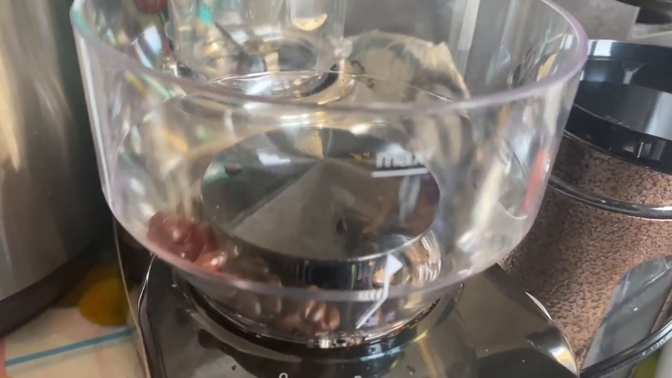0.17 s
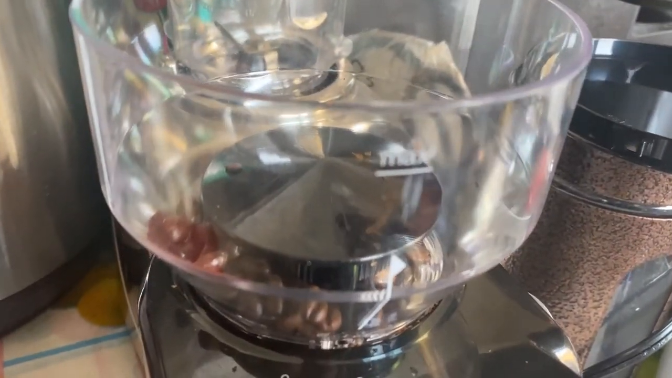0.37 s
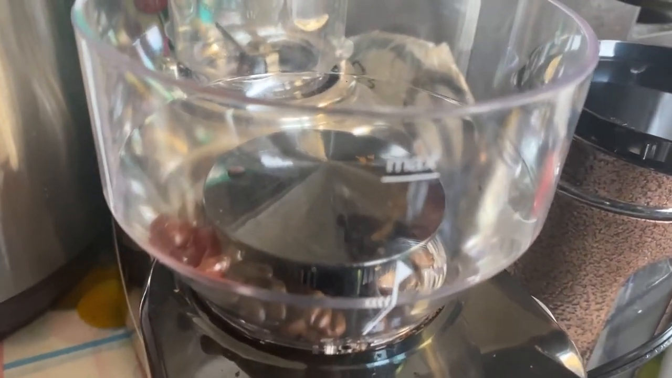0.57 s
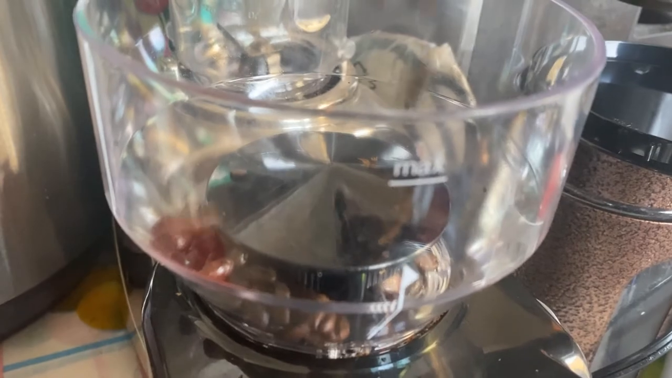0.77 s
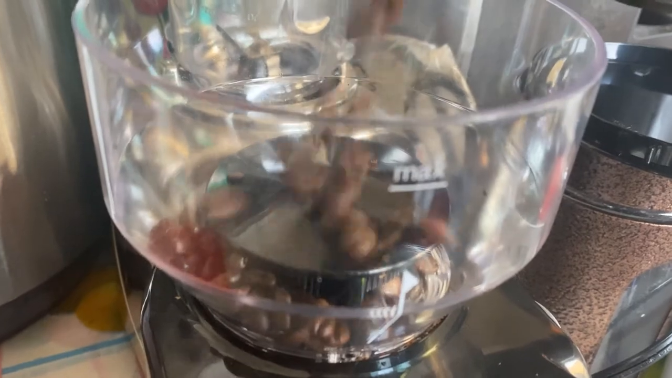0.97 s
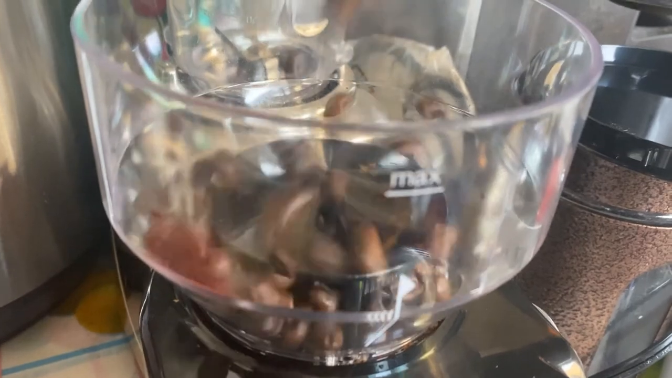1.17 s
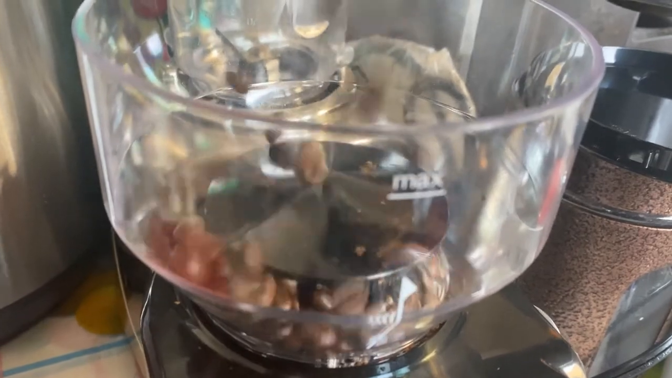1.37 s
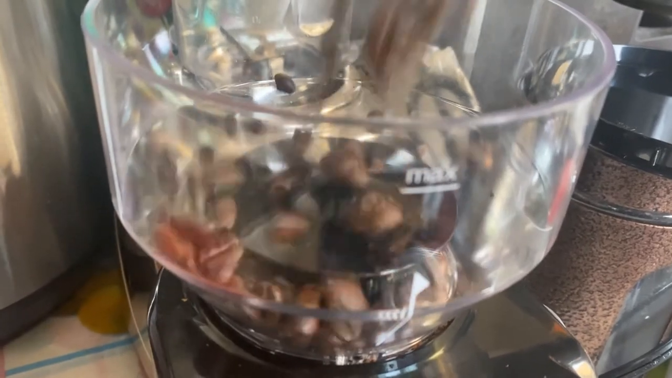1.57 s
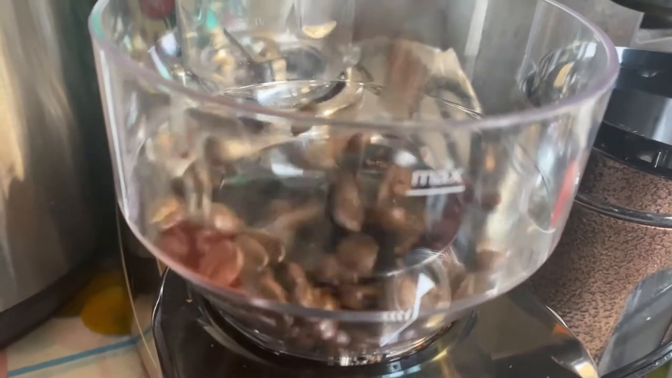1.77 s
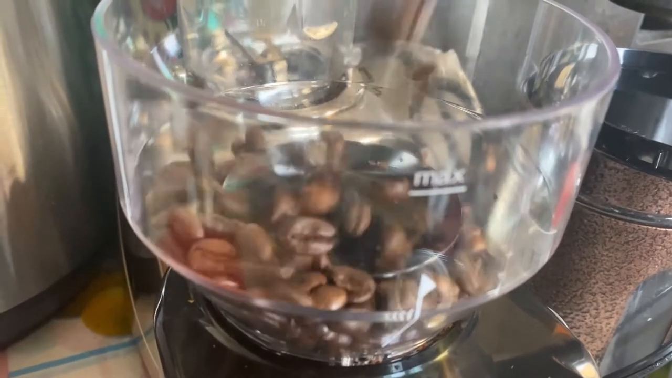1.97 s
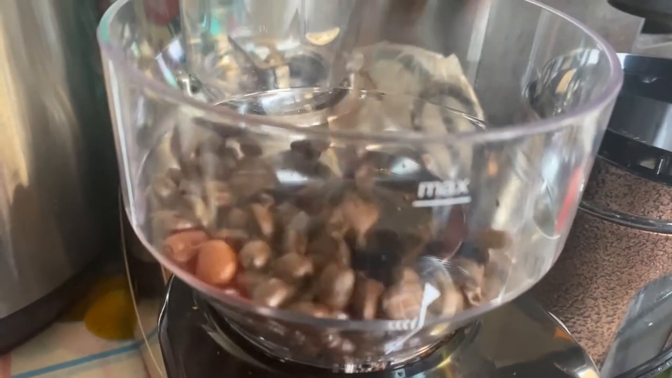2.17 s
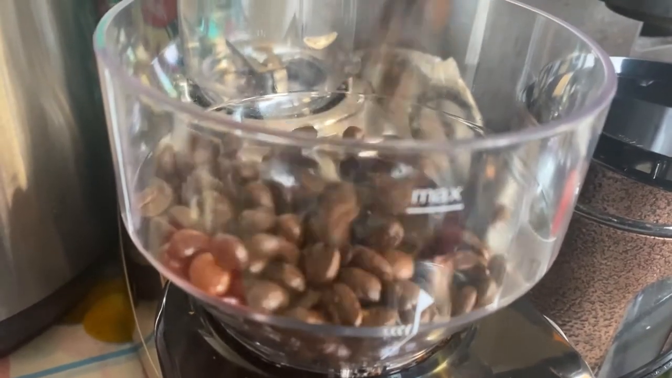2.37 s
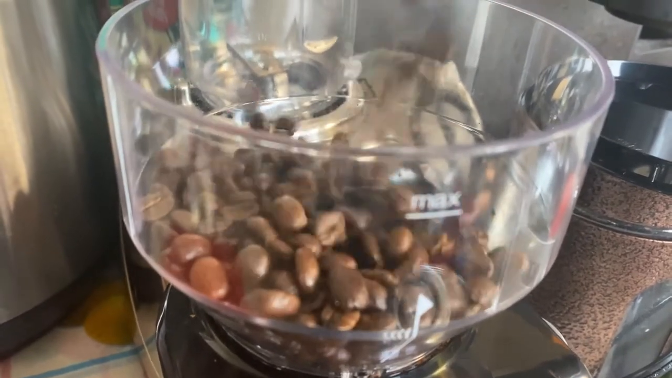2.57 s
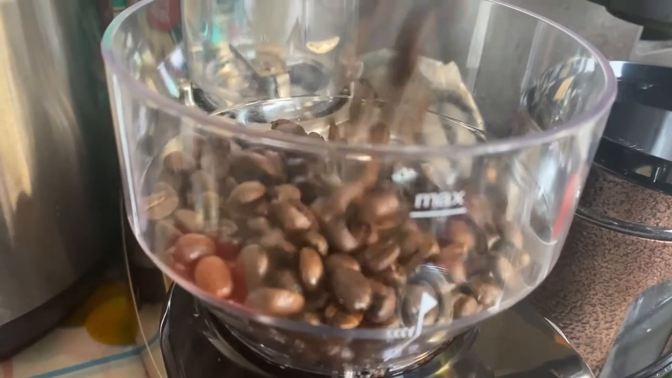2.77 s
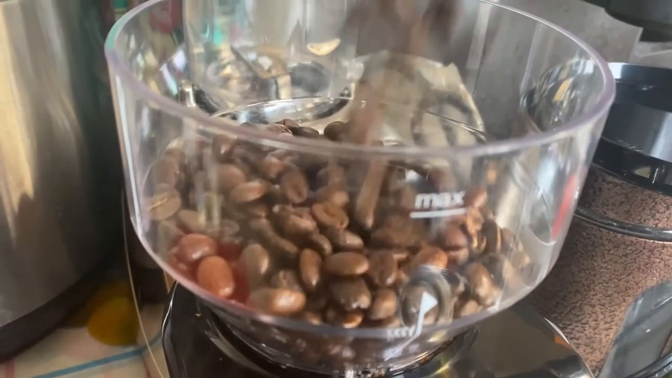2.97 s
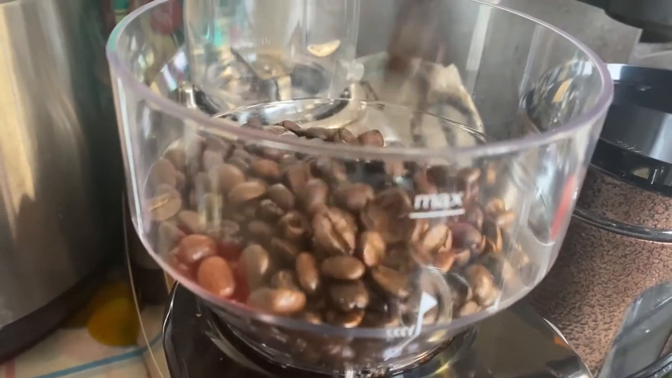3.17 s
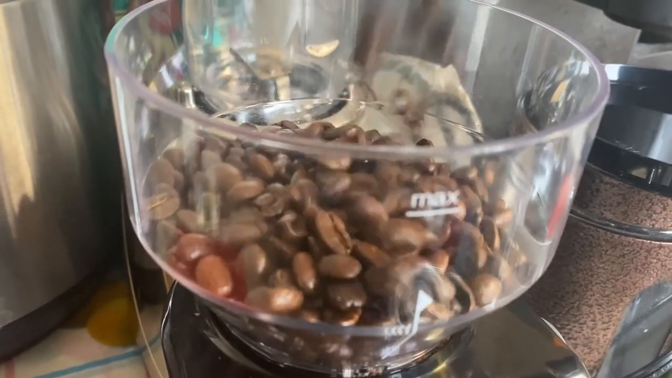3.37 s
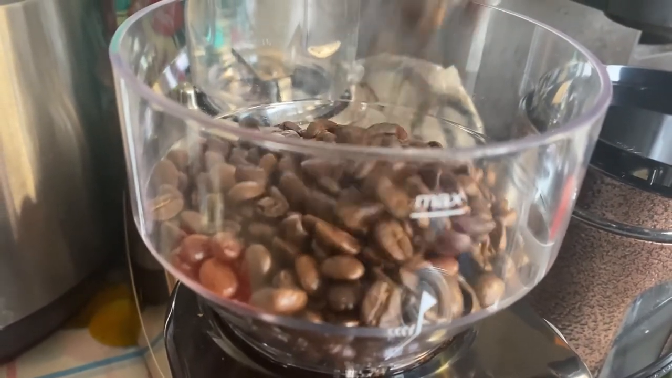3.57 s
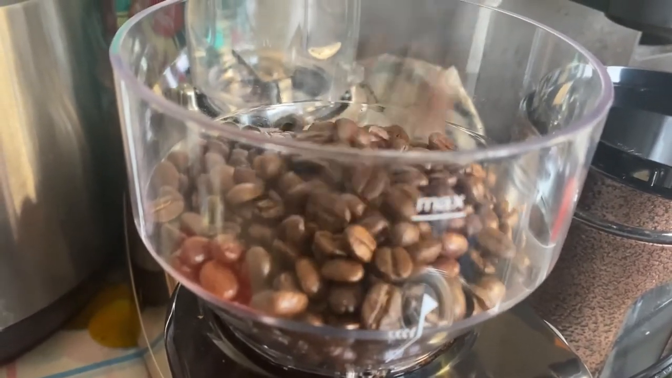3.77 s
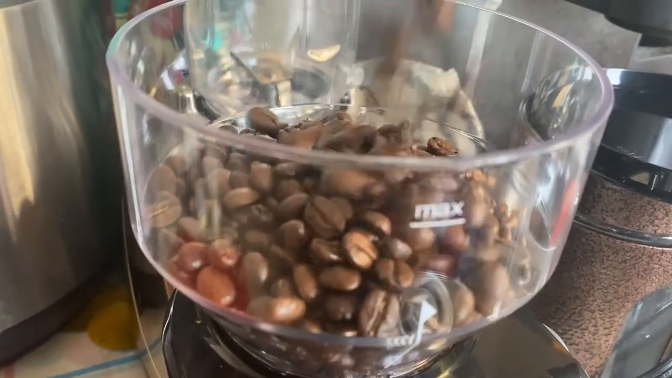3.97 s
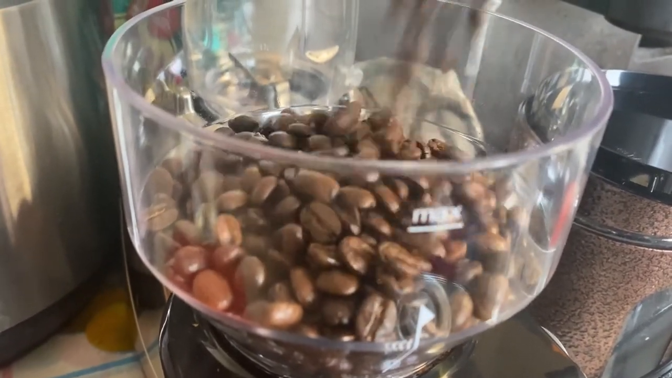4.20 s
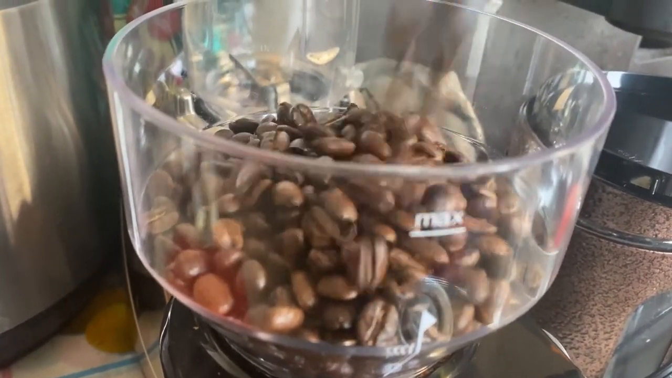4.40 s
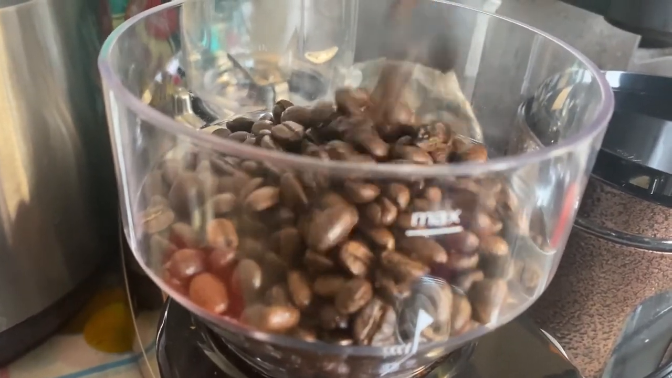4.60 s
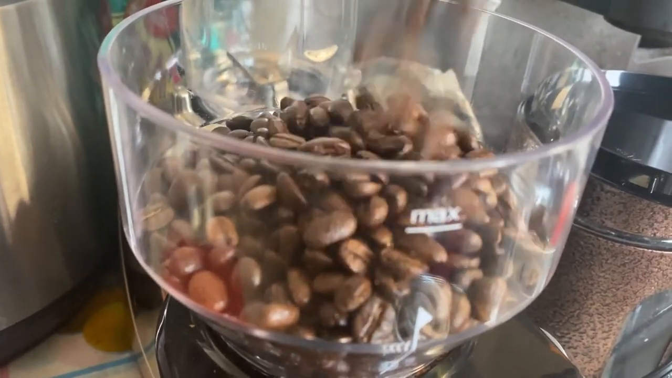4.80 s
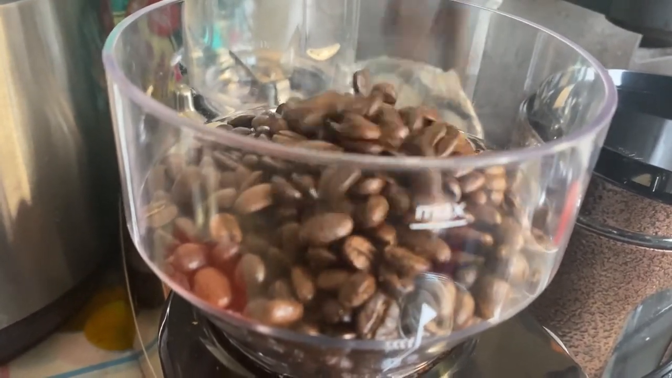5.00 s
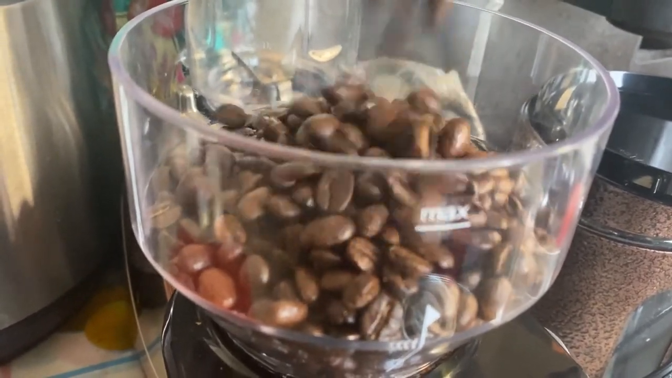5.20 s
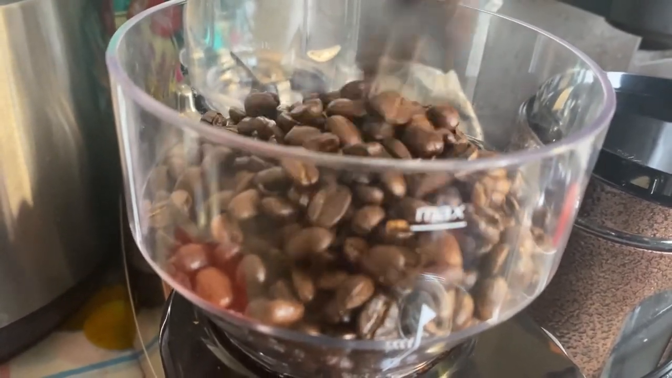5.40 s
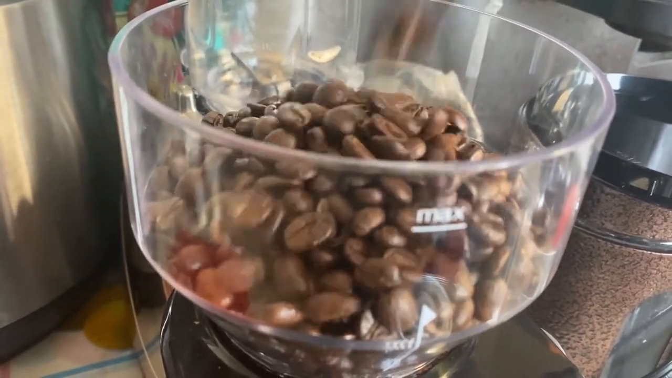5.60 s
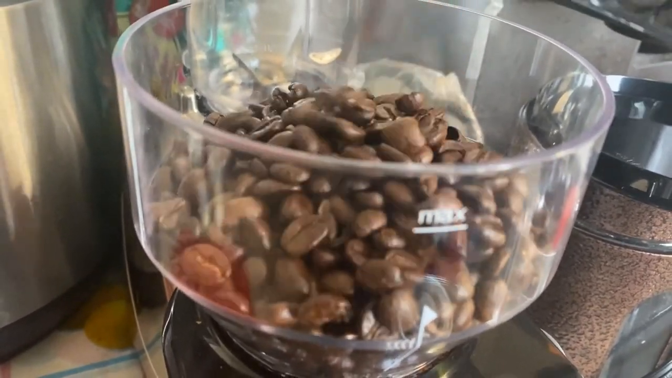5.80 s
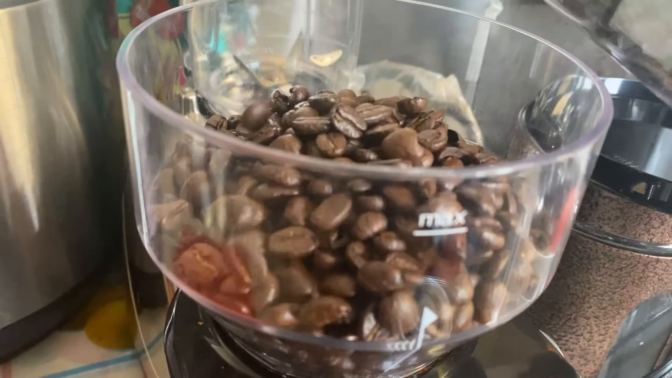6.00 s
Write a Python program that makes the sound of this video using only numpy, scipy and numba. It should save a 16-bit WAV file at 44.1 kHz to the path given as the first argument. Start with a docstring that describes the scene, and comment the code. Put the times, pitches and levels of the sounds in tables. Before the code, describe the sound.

In a home kitchen with a low throbbing hum, a few coffee beans tick and knock in a tipped container. Suddenly they pour into a grinder's empty plastic hopper, cracking sharply on the bare cover and ringing walls. The dense rattle surges, then grows softer and quieter as beans land on beans, ending in sparse ticks. Close stereo microphone, short room reflections.

```python
"""A low hum throbs in a home kitchen while a few coffee beans tick and slide in a container being tipped.
Then they pour into a grinder's clear plastic hopper, striking the bare burr cover and the wall, which ring.
Later they land on the growing heap, which damps the hopper and leaves a soft, dense ticking.
Clicks set off noise bursts, pings and ringing modes; the room is filtered noise, the echo a short noise tail."""
import sys
import numpy as np
from scipy import signal
from scipy.fft import rfft, irfft, next_fast_len
from scipy.io import wavfile
from scipy.ndimage import uniform_filter1d
from numba import njit

SR = 44100
rng = np.random.default_rng(int(sys.argv[2]) if len(sys.argv) > 2 else 0)


def wav_record(signal):
    """Record a signal, one row per channel, as 16-bit PCM in the file named by sys.argv[1]."""
    frames = np.transpose(np.atleast_2d(signal))
    bounded = np.clip(frames, -1, 1)
    # unit amplitude maps onto the largest positive 16-bit level
    quanta = np.round(bounded * 32767).astype(np.int16)
    wavfile.write(sys.argv[1], SR, quanta)


N = 266760
TIME = np.arange(N) / SR
PADDED = next_fast_len(N + SR // 2)   # spare room so that filter tails do not wrap around
FREQS = np.maximum(np.fft.rfftfreq(PADDED, 1 / SR), 1)
CUTOFF_HZ = 15850   # top of the sound
CRACK_S, RING_S = .005, .009   # lengths over which the levels of cracks and of thuds are meant


def from_db(db):
    """Decibels to gain."""
    return 10 ** (np.asarray(db) / 20)


def in_time(rows):
    """Each column of a curve at every sample."""
    s, *columns = np.transpose(rows)
    return [np.interp(TIME, s, column) for column in columns]


def at_hz(points):
    """A spectrum table at every frequency."""
    hz, value = np.transpose(points)
    return np.interp(np.log(FREQS), np.log(hz), value)


def filtered(x, response):
    """Apply a frequency response."""
    return irfft(rfft(x, PADDED) * response, PADDED)[..., :N]


def high_passed(x, edge_hz):
    """Small bodies radiate little below their lowest mode."""
    return signal.sosfilt(signal.butter(4, edge_hz, "high", fs=SR, output="sos"), x)


def coloured(x, spectrum):
    """Filter to a colour without smearing clicks backwards (minimum phase), at unit power gain."""
    gain = from_db(at_hz(spectrum))
    gain = gain / np.sqrt(np.mean(gain[FREQS < CUTOFF_HZ] ** 2))
    cepstrum = irfft(np.log(gain), PADDED)
    # folding the second half onto the first makes the filter minimum-phase
    cepstrum[1:PADDED // 2] *= 2
    cepstrum[PADDED // 2 + 1:] = 0
    return filtered(x, np.exp(rfft(cepstrum)))


def panned(left_db):
    """Left and right gains that keep the power."""
    gains = from_db(np.array([[.5], [-.5]]) * left_db)
    return gains / np.sqrt(np.mean(gains ** 2, axis=0))


def wander(length):
    """Smooth random curve of spread 1 that changes over the given seconds."""
    size = max(int(length * SR), 1)
    return uniform_filter1d(rng.standard_normal(N), size) * np.sqrt(size)


# Colour of the room's noise. Each row: frequency in Hz, relative level in dB.
ROOM_COLOUR = [(20, -13), (40, -8), (62, 3.5), (100, -10), (150, -10), (250, -17), (450, -22), (750, -37),
               (1500, -41.5), (6000, -46), (9000, -55), (16000, -75)]
# Loudness of the room, hum included. Each row: time in seconds, level in dB.
ROOM_LEVEL_CURVE = [(0, -53), (0.92, -54), (1.05, -64), (2.4, -65.5), (5.0, -61), (6.05, -58.5)]
HUM_HZ, HUM_WIDTH_HZ = 60.7, 7.5
HUM_DB = -17.5   # against the room's noise


def background():
    """Room rumble and hiss, with a hum made of a narrow band of noise, which therefore throbs."""
    level_db, = in_time(ROOM_LEVEL_CURVE)
    shared = rng.standard_normal(N)
    separate = 0.37 * rng.standard_normal((2, N))   # different at each side
    air = coloured(shared + separate, ROOM_COLOUR)
    hum_band = 1 / (1 + (2 * (FREQS - HUM_HZ) / HUM_WIDTH_HZ) ** 2)
    hum = filtered(rng.standard_normal(N), hum_band)
    return from_db(level_db) * (air + from_db(HUM_DB) * hum / np.std(hum))


def clicks_at(times, levels_db, length):
    """One click per event, holding the energy of that level kept up for the given seconds."""
    out = np.zeros(N)
    samples = np.clip(np.round(times * SR).astype(int), 0, N - 1)
    out[samples] = from_db(levels_db) * np.sqrt(length * SR)
    return out


def collisions(per_s, spread_db, clump_db):
    """Random clicks of uneven size that come in clumps, evened out to a mean power near 1."""
    size_db = spread_db * np.minimum(rng.exponential(1, N), 3.5)
    sizes = from_db(size_db + clump_db * wander(.007))
    clicks = sizes * rng.choice([-1, 1], N) * (rng.random(N) < per_s / SR)
    power = uniform_filter1d(uniform_filter1d(clicks ** 2, size=1100), size=1100)
    return clicks / np.sqrt(np.abs(power) + 1e-6)


def dying_noise(clicks, t60, rise_s, alike):
    """Every click becomes a burst of noise of the same energy, partly alike left and right."""
    power = clicks ** 2 + 1e-18
    fall, rise = from_db(-120 / (t60 * SR)), np.exp(-1 / (rise_s * SR))
    for r in (fall, rise):
        power = signal.lfilter([1 - r], [1, -r], power)
    alike = np.clip(alike, 0, 1)
    shared = np.sqrt(alike) * rng.standard_normal(N)
    separate = np.sqrt(1 - alike) * rng.standard_normal((2, N))
    return np.sqrt(power) * (shared + separate)


def ticks(clicks, crack_t60, bean_t60, bean_db, scatter_t60, scatter_db):
    """A contact is a short crack, a ping at that bean's own pitch, and scatter between the walls."""
    direct = dying_noise(clicks, crack_t60, rise_s=0.00036, alike=0.73)
    pitches_hz = np.geomspace(4400, 15500, num=28)
    dealt = rng.integers(0, len(pitches_hz), N)   # which pitch a click gets
    r = from_db(-60 / (bean_t60 * SR))
    for k, w in enumerate(2 * np.pi * pitches_hz / SR):
        own_clicks = clicks * (dealt == k) + 1e-18
        ping = signal.lfilter([0, np.sin(w)], [1, -2 * r * np.cos(w), r * r], own_clicks)
        direct += from_db(bean_db) * np.sqrt(2 * (1 - r * r)) * ping
    scatter = dying_noise(clicks, scatter_t60, rise_s=0.00068, alike=0.15)
    both = direct + from_db(scatter_db) * scatter
    return both / np.sqrt(1 + from_db(bean_db) ** 2 + from_db(scatter_db) ** 2)


# Beans shifting in the tilted container. Each row: start in seconds, tick level in dB, knock level in dB.
SHIFTING_BEANS = [(0.2975, -64, -58), (0.4489, -57, -65), (0.4858, -47.5, -70), (0.5177, -50, -76),
                  (0.6414, -52, -68), (0.6655, -45, -63), (0.692, -45.5, -72), (0.728, -44.5, -55),
                  (0.7622, -60, -47), (0.7998, -46, -38.5), (0.8102, -47, -52)]
# Beans sliding towards its lip. Each row: time in seconds, level in dB.
SLIDE_LEVEL = [(0, -84.5), (0.42, -77), (0.5, -69), (0.61, -83), (0.66, -57), (0.82, -61), (1.0, -47),
               (1.3, -103)]
# Colour of a tick inside the container. Each row: frequency in Hz, relative level in dB.
CONTAINER_COLOUR = [(150, -26), (450, 6), (1000, -15), (2000, -18), (4000, -6), (7000, 4), (12000, 2),
                    (16000, -5)]
# Colour of the dull knock of its wall. Each row: frequency in Hz, relative level in dB.
KNOCK_COLOUR = [(100, -10), (450, 12), (800, 1), (1500, -3.5), (2800, 2.5), (5000, -6), (12000, -23)]


def container():
    """Beans tick and slide in the container as it tips, and knock dully on its wall."""
    s, tick_db, knock_db = np.transpose(SHIFTING_BEANS)
    slide_db, = in_time(SLIDE_LEVEL)
    sliding = from_db(slide_db) * collisions(570, spread_db=8.5, clump_db=7.0)
    bright = ticks(clicks_at(s, tick_db, CRACK_S) + sliding, crack_t60=0.0049,
                   bean_t60=0.0044, bean_db=-17, scatter_t60=0.0092, scatter_db=-6)
    knocks = clicks_at(s, knock_db, CRACK_S) + from_db(1.0) * sliding
    dull = dying_noise(knocks, t60=0.078, rise_s=0.00064, alike=0.47)
    return coloured(bright, CONTAINER_COLOUR) + coloured(dull, KNOCK_COLOUR)


def twinned(clicks, gap_s, again_db):
    """Each click gets a twin, usually weaker, a moment away (before it if gap_s is negative)."""
    at = np.flatnonzero(clicks)
    gaps = (gap_s * SR * (.3 + rng.random(len(at)))).astype(int)
    twin_at = np.minimum(at + gaps, N - 1)
    again = np.zeros(N)
    again[twin_at] = clicks[at] * from_db(again_db) * rng.uniform(-1.7, 1.7, len(at))
    return (clicks + again) / np.sqrt(1 + from_db(again_db) ** 2)


@njit
def resonate(drive, pole):
    """A band-pass mode whose pitch and damping move."""
    out, state = np.zeros(len(drive)), 0j
    for i in range(len(drive)):
        state = state * pole[i] + drive[i]
        out[i] = state.real - drive[i] / 2
    return out


def ringing(modes, strikes, fill, uneven_db, detune):
    """Each strike excites each mode by its own amount; the shifting heap retunes and damps the modes."""
    out = np.zeros((2, N))
    for hz_empty, hz_full, db_empty, db_full, t60_empty, t60_full, left_db in modes:
        t60 = t60_empty + (t60_full - t60_empty) * fill
        r = from_db(-60 / (t60 * SR))
        luck_db = uneven_db * (2 * rng.random(N) - 1)
        level_db = db_empty + (db_full - db_empty) * fill + luck_db
        drive = strikes * from_db(level_db) * rng.choice([-1, 1], N)
        shift = np.clip(hz_full / hz_empty - 1, -.09, .09)
        hz = hz_empty * (1 + shift * fill) * (1 + detune * wander(0.0277))
        pole = r * np.exp(2j * np.pi * hz / SR)
        out += panned(left_db) * resonate(drive * np.sqrt(2 * (1 - r * r)), pole)
    return out


# Colour of a bean on a hard surface. Each row: frequency in Hz, relative level in dB.
CRACK_COLOUR = [(170, -40), (270, -35), (500, -19.5), (900, -15), (1600, -8.5), (2150, -20.5), (3200, 0.5),
                (4100, -3), (4500, -2), (5150, 2), (6000, -1), (7000, 2.5), (9300, -1), (12000, 3.5),
                (13500, -6), (15800, -3)]
HEAP_DAMPS_HZ = 4070


def bare_cracks(cracks, fill):
    """Beans crack on bare plastic; a filling hopper takes away much of the sound below the bright click."""
    hard = ticks(cracks, crack_t60=0.0027, bean_t60=0.014, bean_db=-9.0, scatter_t60=0.019, scatter_db=-2.5)
    low_part = filtered(hard, 1 / (1 + (FREQS / HEAP_DAMPS_HZ) ** 20))
    return coloured(hard - 0.71 * fill ** 4 * low_part, CRACK_COLOUR)


# Ringing of the plastic wall (high modes). Each row: pitch in Hz when empty and when full (the heap moves it
# at most 9 %), level in dB empty and full, time to fall 60 dB in seconds empty and full, left over right in dB.
WALL_MODES = [(4910, 4766, -15, -12.5, 0.033, 0.022, -2), (5285, 5120, -10.5, -9, 0.015, 0.0098, 4),
              (7040, 7130, -8, -11, 0.0066, 0.0058, 1), (8630, 7600, -12.5, -14, 0.022, 0.0078, 1.5),
              (10620, 12000, -11, -58, 0.0086, 0.0075, -3), (11580, 11000, -21.5, -18.5, 0.0076, 0.0099, 1)]


def hopper_wall(cracks, fill):
    """The cracks set the plastic wall ringing."""
    return high_passed(ringing(WALL_MODES, cracks, fill, uneven_db=3.5, detune=.015), edge_hz=2640)


# Ringing of the burr cover and its seat (low modes). Each row: pitch in Hz when empty and when full (the heap
# moves it at most 9 %), level in dB empty and full, time to fall 60 dB in seconds empty and full,
# left over right in dB.
COVER_MODES = [(271.5, 266, -27.5, -30.5, 0.17, 0.06, 11), (875, 915, -18.5, -7, 0.035, 0.012, 4.5),
               (1360, 1437, -3, -4, 0.059, 0.013, 6), (1425, 1590, -13, -3, 0.017, 0.037, 1.5),
               (2445, 2710, -16, -36, 0.11, 0.057, 26), (2913, 3120, -11, -14, 0.071, 0.029, 5),
               (3232, 3330, 0, -3.5, 0.042, 0.02, 7.5), (4140, 3960, -12, -0.5, 0.07, 0.015, 7)]
CONTACT_HZ = 4970


def burr_cover(thuds, fill):
    """Thuds ring the burr cover; a thud is a soft contact, so its treble is rounded off."""
    cover = ringing(COVER_MODES, thuds, fill, uneven_db=4.0, detune=0.0067)
    cover = signal.sosfilt(signal.butter(2, CONTACT_HZ, fs=SR, output="sos"), cover)
    return high_passed(cover, edge_hz=284)


# Colour of a bean on other beans. Each row: frequency in Hz, relative level in dB.
HEAP_COLOUR = [(150, -18), (280, -2.5), (480, 8), (680, 1), (900, 7), (1200, -3.5), (1480, 1.5),
               (2150, -1.5), (2800, 2), (4300, -3), (5200, -3), (9000, -1), (13500, 1), (15000, 3)]


def heap_ticks(heap_flow, per_s):
    """Beans landing on beans tick softly."""
    on_heap = heap_flow * collisions(per_s, spread_db=2.5, clump_db=2.5)
    soft = ticks(on_heap, crack_t60=0.003, bean_t60=0.006, bean_db=0, scatter_t60=0.016, scatter_db=-3.5)
    return coloured(soft, HEAP_COLOUR)


def bright_ticks(heap_flow):
    """Sparse, very short and bright ticks among the soft heap ticks."""
    sparse = heap_flow * from_db(-4) * collisions(65, spread_db=6.0, clump_db=5.0)
    return high_passed(dying_noise(sparse, t60=0.0019, rise_s=.0001, alike=1.0), edge_hz=8700)


# About thirty middling beans a second stand a little out of the stream: crack and thud against its level.
MIDDLING_PER_S, MIDDLING_CRACK_DB, MIDDLING_THUD_DB, MIDDLING_SPREAD_DB = 30, -0.5, -11.5, 2.5
MIDDLING_ON_HEAP_DB = 2   # such a crack stands out more from the soft ticking of a full hopper


def middling_beans(stream_db, bare_db, fill):
    """Beans leave the lip at uneven intervals; they thud less as the heap buries the cover."""
    chance = rng.random((400, 3))
    s = LOUD_BEANS[0][0] + np.cumsum(.25 + 1.5 * chance[:, 0]) / MIDDLING_PER_S
    luck_db = MIDDLING_SPREAD_DB * np.sqrt(12) * (chance[:, 1:] - .5)
    crack_db = np.interp(s, TIME, stream_db + MIDDLING_ON_HEAP_DB * fill) + MIDDLING_CRACK_DB + luck_db[:, 0]
    thud_db = np.interp(s, TIME, stream_db + bare_db) + MIDDLING_THUD_DB + 2 * luck_db[:, 1]
    return np.transpose([s, crack_db, thud_db])[s < TIME[-1]]   # rows as in LOUD_BEANS


# Beans that stand out of the rattle. Each row: start in seconds, crack level in dB,
# level in dB of the thud into the burr cover.
LOUD_BEANS = [(0.8436, -11.5, -17.5), (0.8696, -10.5, -31.5), (0.8982, -16, -29), (0.9151, -10, -19.5),
              (0.9451, -14.5, -53), (0.9616, -23, -29.5), (0.9882, -17, -65), (1.025, -12.5, -36),
              (1.0455, -14.5, -29), (1.052, -14, -22.5), (1.088, -15.5, -48), (1.133, -12.5, -50),
              (1.175, -15, -33), (1.205, -27, -31), (1.2594, -15, -31), (1.3052, -13, -39),
              (1.329, -14.5, -37), (1.379, -18, -40), (1.4825, -16, -30), (1.5229, -18, -29),
              (1.5933, -21, -34.5), (1.6055, -17, -26), (1.649, -25, -47), (1.8228, -19, -29.5),
              (1.899, -14, -30), (1.948, -24.5, -44), (1.9619, -15.5, -31.5), (2.0236, -17.5, -31.5),
              (2.1032, -22, -32), (2.155, -20.5, -30), (2.213, -22.5, -40), (2.3186, -19, -25.5),
              (2.4138, -21.5, -29.5), (2.4924, -17.5, -30), (2.5423, -19, -30), (2.6261, -20, -38),
              (2.7504, -20, -32.5), (2.8127, -35, -39), (2.885, -20, -30), (2.935, -17.5, -34),
              (3.052, -26, -33.5), (3.072, -21, -33), (3.1195, -22.5, -30), (3.1692, -20, -35.5),
              (3.2947, -27.5, -36), (3.3494, -17.5, -36), (3.3698, -24.5, -39), (3.455, -28, -55),
              (3.503, -26, -53), (3.529, -27, -50), (3.6248, -29.5, -38.5), (3.7982, -25.5, -55),
              (3.8225, -27, -40.5), (3.9521, -31, -59), (3.9917, -32, -48), (4.127, -34, -62),
              (4.1678, -29, -45), (4.5194, -29, -69), (4.773, -31, -67), (5.0808, -48, -68),
              (5.176, -36, -61), (5.276, -31, -53), (5.295, -29.5, -70), (5.3385, -28.5, -55),
              (5.457, -23, -70), (5.6433, -29, -68), (5.6991, -29, -72), (5.7555, -29.5, -57),
              (5.838, -37.5, -68), (5.8712, -37, -65), (5.9342, -34.5, -64), (5.998, -35, -65),
              (6.0196, -33.5, -76)]
# The stream of small collisions gushes, eases, surges again, fades as the heap cushions it and runs out.
# Each row: time in seconds, level in dB.
STREAM_LEVEL = [(0.84, -42), (0.99, -28), (1.04, -20.5), (1.22, -17), (1.45, -24.5), (1.62, -23.5),
                (1.72, -18), (1.88, -24.5), (2.35, -23.5), (2.57, -27.5), (2.68, -24), (3.03, -30),
                (3.6, -28.5), (3.95, -35.5), (5.0, -40), (5.7, -42), (5.95, -49)]
# How the hopper fills. Each row: time in seconds, fill from 0 to 1, collisions per second,
# share of the stream on bare surfaces in dB, share on the heap in dB.
FILLING = [(0.84, 0.06, 300, -13, -33), (1.15, 0, 1570, -2, -25), (2.0, 0.16, 980, -2, -20.5),
           (2.8, 0.32, 855, -2.5, -18), (3.5, 0.72, 840, -4.5, -17), (3.9, 0.75, 990, -7, -8.5),
           (4.3, 0.78, 1000, -10.5, -5), (5.6, 0.98, 600, -16.5, -1), (6.05, 0.95, 120, -11, -3)]
# Left-right balance of the rattle. Each row: frequency in Hz, left over right in dB.
RATTLE_BALANCE = [(80, -16), (250, 6.5), (700, -0.5), (1200, 5.5), (2700, 3.5), (3700, -0.5), (5400, 13),
                  (7000, -1), (9000, 0.5), (16000, -0.5)]
TAP_DB = -10.5   # the other beans only tap the cover: share of the stream's bare part


def pour():
    """Single beans and the stream of small collisions, on bare surfaces and on the heap."""
    stream_db, = in_time(STREAM_LEVEL)
    fill, per_s, bare_db, heap_db = in_time(FILLING)
    fill = np.clip(fill, 0, 1)
    s, crack_db, thud_db = np.vstack([LOUD_BEANS, middling_beans(stream_db, bare_db, fill)]).T
    flow = from_db(stream_db) * (TIME > s[0])
    bare_flow, heap_flow = flow * from_db(bare_db), flow * from_db(heap_db)
    on_bare = bare_flow * collisions(per_s, spread_db=3.5, clump_db=4.0)
    single = clicks_at(s, crack_db, CRACK_S)
    # a faint click a moment before each single one softens its onset
    softened = twinned(single, gap_s=-0.0028, again_db=-12.0)
    # a bean is not round: each contact has a second one a moment later
    cracks = twinned(softened + on_bare, gap_s=.0016, again_db=-2.0)
    taps = bare_flow * from_db(TAP_DB) * collisions(per_s, spread_db=0.0, clump_db=5.5)
    thuds = clicks_at(s, thud_db, RING_S) + taps
    rattle = bare_cracks(cracks, fill) + heap_ticks(heap_flow, per_s) + bright_ticks(heap_flow)
    rattle = filtered(rattle, panned(at_hz(RATTLE_BALANCE)))
    return rattle + hopper_wall(cracks, fill) + burr_cover(thuds, fill)


KITCHEN_T60_S, KITCHEN_DB = 0.071, -9.5


def kitchen(x):
    """A short diffuse tail of dying noise, different at each side."""
    t = TIME[:SR // 2]
    tail = rng.standard_normal((2, len(t))) * from_db(-60 * t / KITCHEN_T60_S) * (t > .004)
    return filtered(x, rfft(tail / np.sqrt(np.sum(tail[0] ** 2)), PADDED))


def scene():
    """The beans close by, the kitchen around them."""
    beans = container() + pour()
    return background() + beans + from_db(KITCHEN_DB) * kitchen(beans)


# The microphone pair. Each row: frequency in Hz, phase lead of the right side in radians.
RIGHT_PHASE_LEAD = [(50, 0), (1000, -.6), (3200, -.8), (4000, 0), (6700, -.3), (9000, 3.1), (11200, 6.2),
                    (13300, 9.4), (15200, 12.6), (16500, 12.5)]


def record(dry):
    """The two microphone ports differ in phase; peaks are rounded and the top is cut."""
    side_phase = at_hz(RIGHT_PHASE_LEAD) * np.array([[-.5], [.5]])   # half the lead to each side
    ports = filtered(dry, np.exp(1j * side_phase))
    rounded = 1.2 * np.tanh(ports / 1.2)
    return filtered(rounded, 1 / np.sqrt(1 + (FREQS / CUTOFF_HZ) ** 500))


dry = scene()
out = record(dry)
wav_record(out)
```